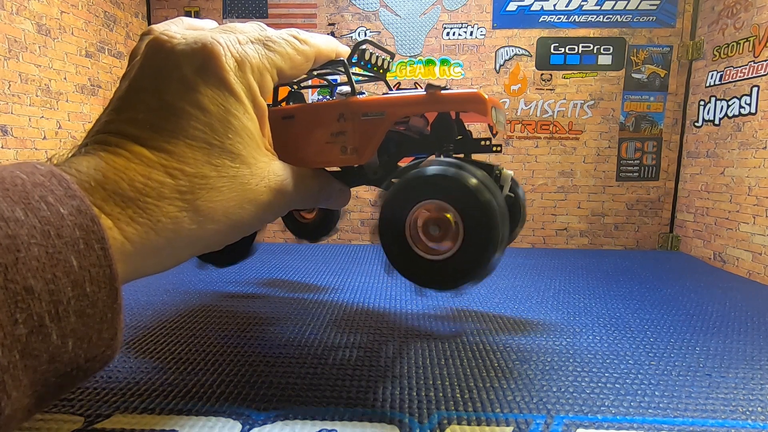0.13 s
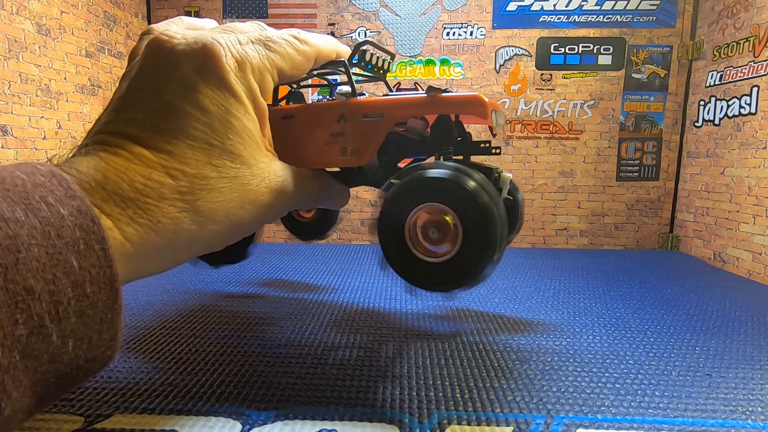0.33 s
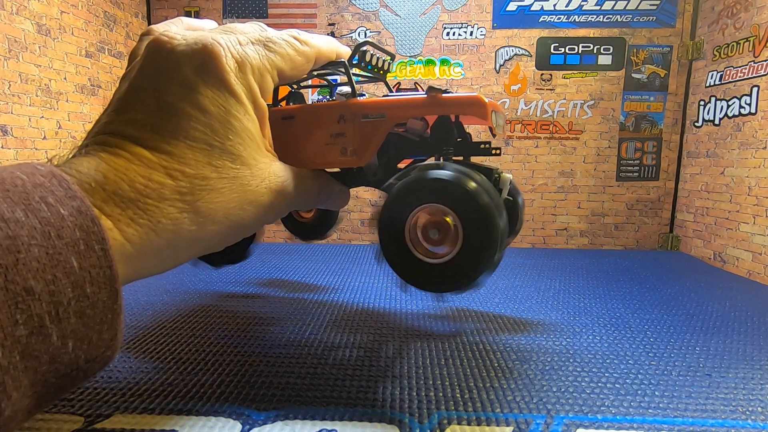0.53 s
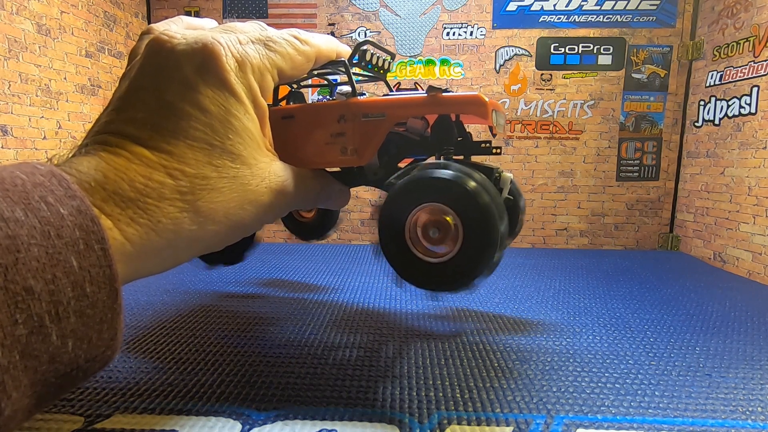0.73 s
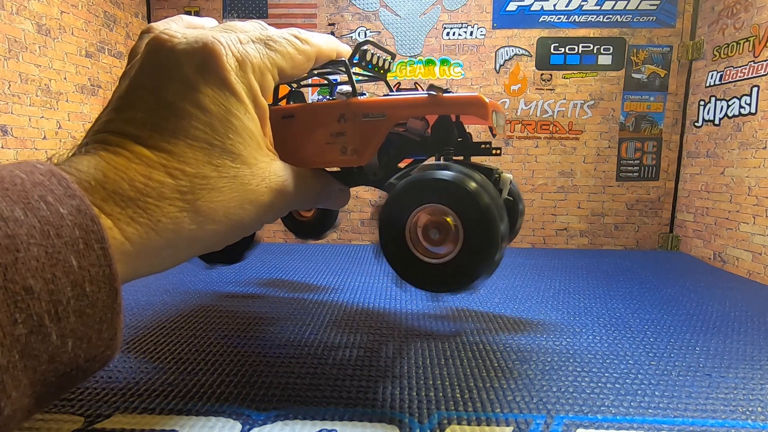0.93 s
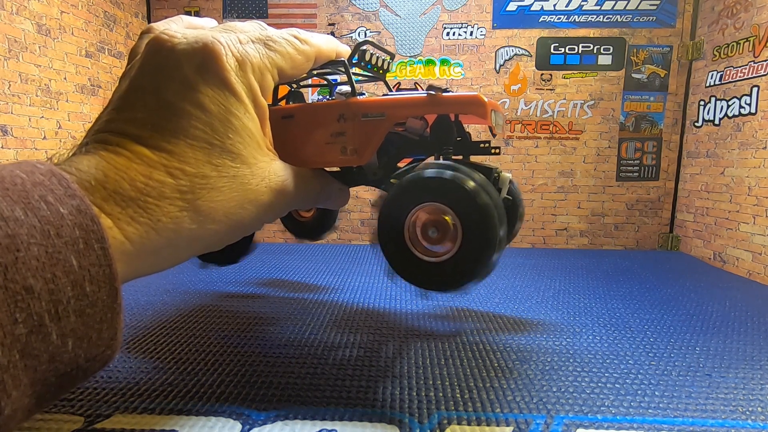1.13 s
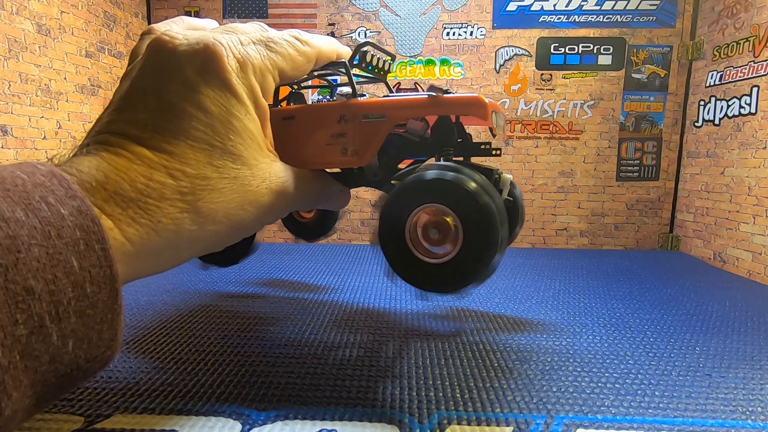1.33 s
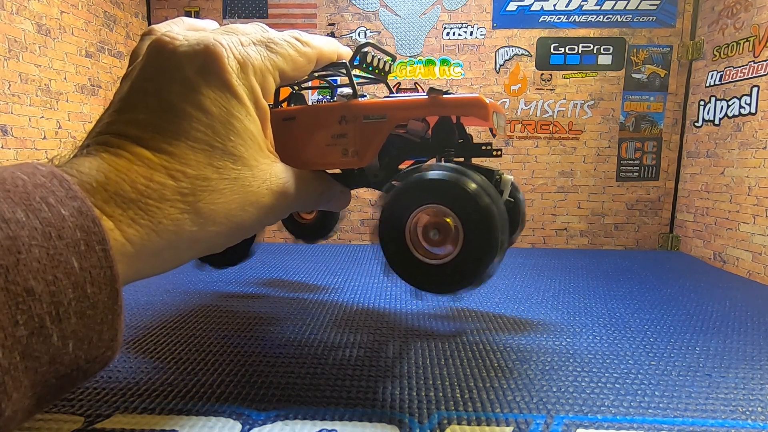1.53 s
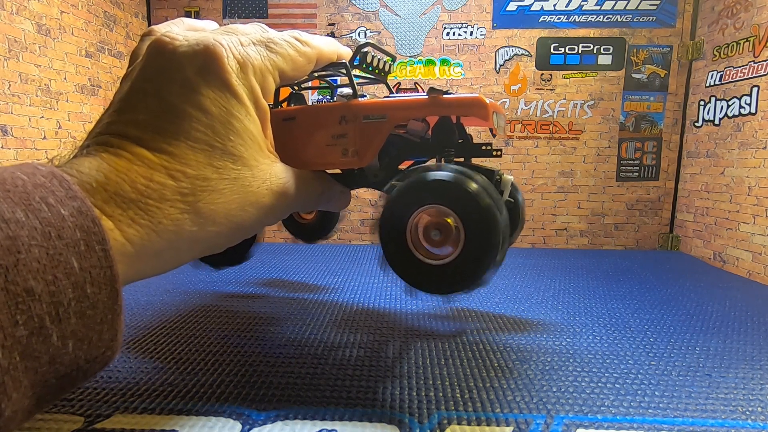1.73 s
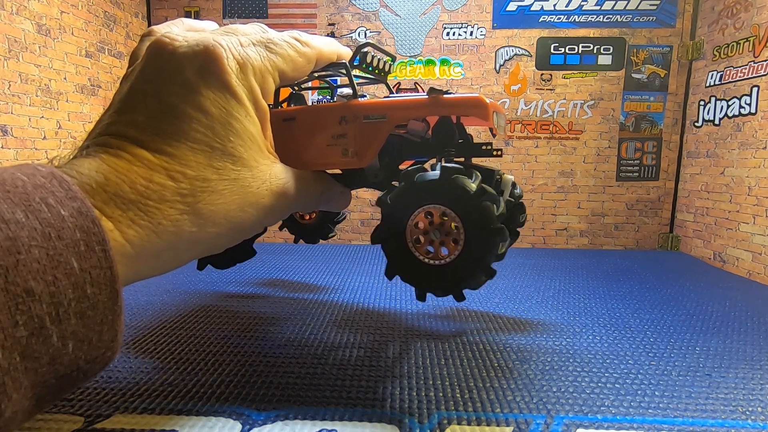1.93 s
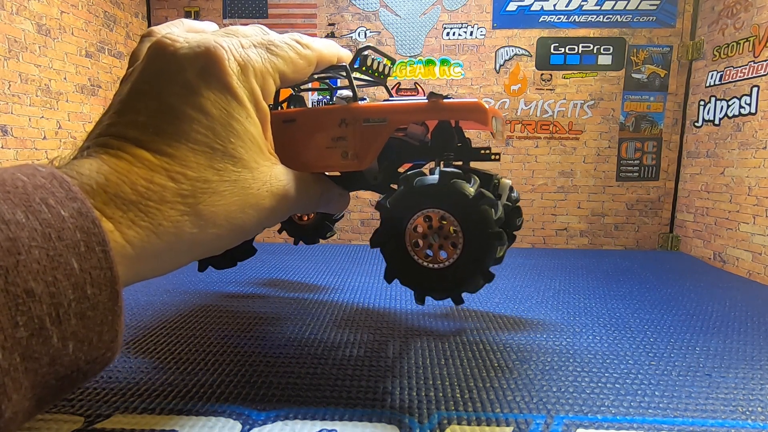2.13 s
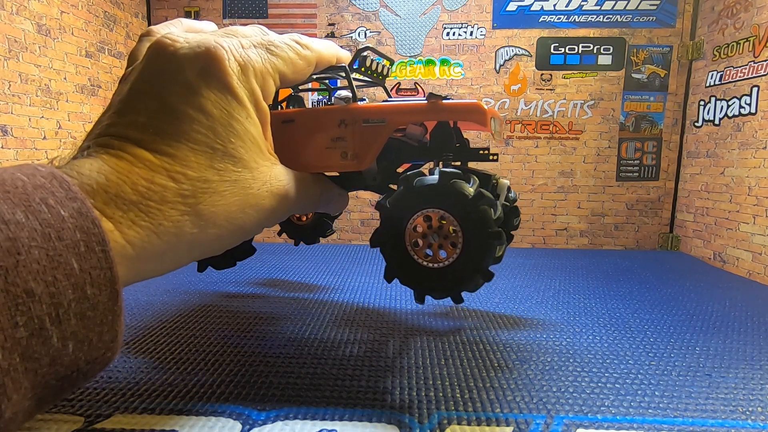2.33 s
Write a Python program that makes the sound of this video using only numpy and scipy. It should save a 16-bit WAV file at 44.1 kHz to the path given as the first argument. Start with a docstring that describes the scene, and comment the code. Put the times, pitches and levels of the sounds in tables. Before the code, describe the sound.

A toy crawler's small motor and gears whine harshly at full throttle, then abruptly clatter to a stop

```python
"""Toy crawler revving in the air

A toy crawler is held up in a small room, its wheels spinning at full throttle. The motor whine and gear whirr
are fluttering sines locked to rotor and shaft; the speed swings with each wheel turn. Rattle, scuffs and knocks
are coloured noise under gear forces, with the rattle sent through ringing resonances. The throttle closes, the
whine falls and the slack gears clatter for a fifth of a second with a few last knocks. A short room tail
follows the gears; the room's hum and noise remain, and a low rumble comes and goes."""
import sys
import numpy as np
from scipy import signal
from scipy.fft import rfft, irfft
from scipy.io import wavfile

SR = 44100
rng = np.random.default_rng(int(sys.argv[2]) if len(sys.argv) > 2 else 0)


def int16_out(signal):
    """Quantize to a 16-bit WAV file."""
    q = np.round(np.clip(np.atleast_2d(signal).T, -1, 1) * 32767)
    wavfile.write(sys.argv[1], SR, q.astype(np.int16))


N = 104472
T = np.arange(N) / SR
ROTOR_HZ, SHAFT_HZ, WHEEL_HZ = 959.5, 100.5, 9.2  # turns per second at full speed; steady wheel rate
FLUTTER_PER_S = 85  # flutter rate of whine and whirr

# stereo likeness of rattle and knocks, clipped to +-0.99 in use: (frequency [Hz], likeness)
GEAR_LIKENESS = [(100, 0), (700, 6.8), (1400, -0.5), (2200, 2.7), (4500, 1), (5700, 0.8), (6800, 12),
                 (7400, -0.2), (7900, 0.23), (9400, -0.02), (10700, -0.14), (11500, 0.6), (14000, 0)]


def from_db(db):
    """Decibels to gain."""
    return 10 ** (np.asarray(db) / 20)


def rms_one(x):
    """Scale to unit power."""
    return x / np.sqrt(np.mean(x ** 2) + 1e-20)


def in_time(rows):
    """A control curve at every sample."""
    return np.interp(T, *np.transpose(rows))


def per_bin(points):
    """A frequency table read on a log axis at every bin of the padded spectrum."""
    hz, value = np.transpose(points)
    bin_hz = np.arange(N + 1) * SR / (2 * N)
    return np.interp(np.log(bin_hz + 1), np.log(hz), value)


def drift(rate):
    """Smooth chance with unit power: white noise through a double one-pole low-pass at rate [Hz]."""
    r = np.exp(-2 * np.pi * rate / SR)
    smooth = signal.lfilter([1], [1, -2 * r, r * r], rng.standard_normal(N + SR))
    return rms_one(smooth[SR:])  # the first second lets the filter settle


def pan(db):
    """Left and right gains for a level difference."""
    return from_db(np.array([[.5], [-.5]]) * db)


def stereo_noise(envelope, spectrum, likeness):
    """Noise under an envelope, coloured and spread between the ears."""
    mid, side = rfft(rng.standard_normal((2, N)) * envelope, 2 * N)
    c = np.clip(likeness, -.99, .99)
    both = np.sqrt(1 + c) * mid + np.sqrt(1 - c) * side * [[1], [-1]]
    colour = rms_one(from_db(per_bin(spectrum)))
    return irfft(both * colour)[:, :N]


def partials(orders, table, turns, flutter_db):
    """Fluttering tones at multiples of a rotation, each reaching the ears with its own level and phase."""
    out = 0
    for order, (db, lean_db, lead) in zip(orders, table):
        phase = 2 * np.pi * (order * turns + rng.random()) + np.array([[lead], [0]])
        flutter = from_db(flutter_db * np.clip(drift(FLUTTER_PER_S), -2, 2))
        tone = np.sin(phase) * flutter
        out = out + from_db(db) * pan(lean_db) * rms_one(tone)
    return out


def motor_whine(rotor):
    """The motor sounds multiples of the rotor rate, each fluttering on its own."""
    # multiples of the rotor rate, one for each partial
    whine_orders = [1, 2, 3, 4, 5, 6, 7, 9, 10, 11]
    # partials before load and speed: (level [dB], left-right difference [dB], left phase lead [rad])
    whine_partials = [(-61, -7.5, 1), (-60, -2, 3), (-44, -5.5, 1), (-45.5, 3, -5), (-46, -4.5, -13),
                      (-37, -9, 6.2), (-30.5, 0.5, 1.1), (-36, 4, 3.5), (-64.5, -0.5, 8), (-67, -1.5, 11.5)]
    return partials(whine_orders, whine_partials, rotor, flutter_db=11)


def gear_whirr(shaft):
    """The gears whirr at multiples of the shaft rate."""
    # multiples of the shaft rate, one for each partial
    whirr_orders = [1, 2, 3, 8, 12, 54.5, 64, 69]
    # balance of the partials: (relative level [dB], left-right difference [dB], left phase lead [rad])
    whirr_partials = [(-65.5, 13, -0), (-56.5, -12, 0.5), (-54, 2.5, 0), (-49, -8, 0.5), (-51.5, 4.5, -0.3),
                      (-38.5, -12, -0.1), (-35.5, 0, 0.32), (-48.5, -2.5, .3)]
    lift_db = 1.5
    return from_db(lift_db) * partials(whirr_orders, whirr_partials, shaft, flutter_db=4.5)


def gear_chatter(shaft):
    """Fast chatter, slower surges and one swing per shaft turn shake the level."""
    chatter_db, surge_db, shaft_swing_db = 1.5, 1, 1
    wobble_db = chatter_db * drift(370) + surge_db * drift(75)
    return rms_one(from_db(wobble_db + shaft_swing_db * np.sin(2 * np.pi * shaft)))


def tooth_force(turns):
    """A tooth strikes once per turn, each time with its own force, over steady rubbing."""
    spread_db, decay_s, rub_share = 1.5, 0.00019, 1  # rubbing against strikes of unit power
    strength = from_db(spread_db * np.clip(rng.standard_normal(N), -2, 2))
    strikes = np.diff(np.floor(turns), prepend=0) * strength
    ringing = signal.lfilter([1], [1, -np.exp(-1 / (decay_s * SR))], strikes + 1e-18)
    return rub_share + rms_one(ringing)


def rattle(turns, chatter):
    """The driven gears rattle in step with the rotor."""
    # colour of the gear rattle: (frequency [Hz], relative level [dB per Hz])
    rattle_colour = [(60, -70), (300, -23), (480, -22.5), (660, -21), (820, -15), (1050, -22),
                     (1400, -19.5), (1900, -15), (2500, -17), (3400, -15.5), (4300, -12), (5300, -3.5),
                     (6000, -8.5), (6600, -1.5), (7500, -11), (8450, -14), (9250, -17), (10300, -17.5),
                     (11400, -28), (14000, -28.5), (15000, -55)]
    force = rms_one(tooth_force(turns) * chatter)
    level_db = -26.5  # before load and resonances
    return from_db(level_db) * stereo_noise(force, rattle_colour, per_bin(GEAR_LIKENESS))


def gearbox(x):
    """The rattle rings at a set of resonances, and each pitch range is thrown to its own side."""
    # resonances rung by the driven rattle: centre frequency [Hz]
    casing_hz = [2530, 2880, 3200, 3900, 5430, 5740, 6440, 6720, 8630, 8850, 9750, 10320]
    # the same resonances: (width [Hz], level over the rattle [dB])
    casing_rings = [(190, 3), (40, 9), (120, -3), (247, -7.5), (200.7, -11), (110, -12), (110.9, -8),
                    (150, -8.5), (110.3, 2.5), (142, 5.5), (296, -2), (220, 0.5)]
    # side each pitch range leans to: (frequency [Hz], left-right difference [dB])
    casing_lean = [(200, -3.5), (800, -0.5), (1450, -5), (1850, 2.5), (2400, -2), (4600, -2), (5600, -1.5),
                   (6300, -5.5), (6700, 3.5), (8000, -13.5), (9000, 1.5), (9800, 2.5), (10600, -1.5),
                   (14000, 0)]
    out = x.copy()
    for hz, (width, db) in zip(casing_hz, casing_rings):
        r = np.exp(-np.pi * width / SR)
        feed = np.array([1, 0, -1]) * (1 - r * r) / 2
        feedback = [1, -2 * r * np.cos(2 * np.pi * hz / SR), r * r]
        out += from_db(db) * signal.lfilter(feed, feedback, x)
    return irfft(rfft(out, 2 * N) * pan(per_bin(casing_lean)))[:, :N]


def scuffs(turns):
    """The gears bind and rasp in short, uneven swells."""
    # swells while the motor drives, about twelve a second: (time [s], level [dB])
    swells = [(0.036, -38), (.12, -37.5), (.195, -40.5), (0.276, -35), (.35, -33), (.435, -38), (.525, -43),
              (0.596, -34), (.67, -39), (.74, -40.5), (0.821, -36), (0.916, -35.5), (1.139, -35),
              (1.23, -34.5), (1.30, -38), (1.39, -40.5), (1.47, -37), (1.559, -35), (1.65, -45),
              (1.71, -39.5), (1.80, -40), (1.84, -38)]
    # colour of the scuffs: (frequency [Hz], relative level [dB per Hz])
    scuff_colour = [(500, -17), (1300, -11), (1850, -2.5), (2400, 2.5), (2900, -1.5), (4000, -11.5),
                    (8000, -32)]
    swell_s = 0.018  # from the peak to 1/e
    force = sum(from_db(db) * np.exp(-((T - s) / swell_s) ** 2) for s, db in swells)
    return stereo_noise(force * rms_one(tooth_force(turns)), scuff_colour, likeness=0.43)


def run_down():
    """The gears whine roughly, at a falling pitch, as the drive slows."""
    # path of the falling whine: (time [s], pitch [Hz], level [dB])
    fall = [(1.845, 5350, -46), (1.87, 5250, -29.5), (1.888, 5150, -44), (1.897, 4600, -37),
            (1.908, 3750, -32), (1.915, 3600, -52)]
    s, hz, db = np.transpose(fall)
    pitch = np.interp(T, s, hz) * (1 + .025 * drift(290))  # the jitter roughens the tone
    level = np.interp(T, s, from_db(db), left=0, right=0)
    return level * rms_one(np.sin(2 * np.pi * np.cumsum(pitch) / SR))


def chassis(speed, turns):
    """The rotor's own tone swells near the pitch of the chassis."""
    chassis_hz, width_hz, level_db = 928, 22, -43.5
    nearness = np.exp(-((ROTOR_HZ * speed - chassis_hz) / width_hz) ** 2)
    return from_db(level_db) * nearness * rms_one(np.sin(2 * np.pi * turns))


def coasting(speed):
    """Unloaded teeth clatter ever more slowly as the drive slows, then cut off."""
    # clatter once the throttle closes, silent outside these times: (time [s], level [dB])
    clatter_level = [(1.84, -46), (1.87, -42), (1.905, -29.5), (1.93, -37), (1.962, -31.5), (1.972, -40.5),
                     (2.032, -43), (2.037, -71.5)]
    # colour of the unloaded gears and casing: (frequency [Hz], relative level [dB per Hz])
    clatter_colour = [(100, -35), (560, -19), (790, -3), (1050, -15), (1300, -19.5), (1500, -3),
                      (2000, -8.5), (2400, -23), (2620, -2.5), (3200, -2.5), (3550, -3.5), (3900, 3),
                      (4350, 0), (5450, 1), (5950, -2), (6500, -1), (7400, -5), (7950, -1.5), (9200, -11),
                      (9850, -3.5), (11000, -21), (14000, -20), (15000, -45)]
    teeth_per_s = 1900  # at full speed
    s, db = np.transpose(clatter_level)
    level = from_db(np.interp(T, s, db)) * (T > s[0]) * (T < s[-1])
    force = rms_one(tooth_force(np.cumsum(teeth_per_s * speed) / SR))
    return stereo_noise(level * force, clatter_colour, likeness=.75)


def knocks():
    """The slack in the gears is taken up in short clacks."""
    # backlash knocks as the drive stops: (time [s], level [dB])
    clacks = [(1.878, -25), (1.989, -30), (1.995, -33), (2.005, -40), (2.025, -41), (2.144, -58)]
    # colour of the knocks: (frequency [Hz], relative level [dB per Hz])
    knock_colour = [(100, -44), (800, -10), (2000, -10.5), (3900, 4.5), (6500, -1.5), (10000, -7),
                    (15000, -33.5)]
    decay_s = .004  # to 1/e
    force = sum(from_db(db) * (T >= s) * np.exp(-np.abs(T - s) / decay_s) for s, db in clacks)
    return stereo_noise(force, knock_colour, per_bin(GEAR_LIKENESS))


def room(x):
    """A short diffuse tail, different at each ear; its treble dies first."""
    t60_s, treble_t60_s, split_hz, gap_s, level_db = 0.6, 0.27, 2460, 0.0005, -8
    t = T[:SR // 2]
    white = rng.standard_normal((2, len(t)))
    low = signal.sosfiltfilt(signal.butter(2, split_hz, fs=SR, output="sos"), white)
    treble = white - low
    tail = low * from_db(-60 * t / t60_s) + treble * from_db(-60 * t / treble_t60_s)
    tail = rms_one(tail * (t > gap_s)) / np.sqrt(len(t))
    return from_db(level_db) * signal.fftconvolve(x, tail, axes=1)[:, :N]


def ambience():
    """Room noise with a faint, wavering hum; beside it, a low rumble comes and goes."""
    # hum tones: (frequency [Hz], level [dB])
    hum_tones = [(58.5, -80.5), (112, -66.5), (247, -60.5)]
    # colour of the room noise: (frequency [Hz], relative level [dB per Hz])
    air_colour = [(25, -36), (55, 3), (80, -12), (150, 0.5), (200, -7.5), (255, -3.5), (310, -13),
                  (390, -11), (560, -15), (1400, -14), (3000, -25.5), (6000, -46), (12000, -61)]
    # stereo likeness of noise and rumble, clipped to +-0.99 in use: (frequency [Hz], likeness)
    air_likeness = [(60, 0.95), (250, 1), (700, 0.28), (2000, 0.24), (8000, .3)]
    # level of the low rumble: (time [s], level [dB])
    rumble_level = [(0, -55), (.14, -62), (.39, -51.5), (.66, -53), (.73, -68), (1.35, -59.5),
                    (1.65, -55.5), (1.76, -64), (1.84, -51.5), (1.95, -65), (2.05, -54), (2.22, -61.5),
                    (2.33, -51)]
    # colour of the rumble: (frequency [Hz], relative level [dB per Hz])
    rumble_colour = [(30, -37), (70, 20), (105, 19.5), (160, 16.5), (260, -29), (450, -44), (2000, -83)]
    air_db, lean_db = -54.5, -0.5
    hum = sum(from_db(db) * rms_one(np.sin(2 * np.pi * hz * T + .5 * drift(1.7))) for hz, db in hum_tones)
    likeness = per_bin(air_likeness)
    air = stereo_noise(from_db(air_db), air_colour, likeness)
    rumble = stereo_noise(from_db(in_time(rumble_level)), rumble_colour, likeness)
    return pan(lean_db) * (hum + air + rumble)


def drive_speed():
    """Share of full speed, swinging once per wheel turn and wandering slightly."""
    # throttle held, then closed: (time [s], share of full speed)
    speed_curve = [(0, 1), (1.83, 1), (1.88, .92), (1.91, .64), (1.97, .4), (2.04, .05)]
    wheel_swing = .004 * np.cos(2 * np.pi * WHEEL_HZ * T)
    return in_time(speed_curve) * (1 + wheel_swing + .0015 * drift(8))


def scene():
    """One speed and one load drive motor, shaft and gears."""
    # force on the driven gears: (time [s], level [dB])
    load_curve = [(0, -2), (.4, -1.5), (1.5, -1.5), (1.76, -2), (1.86, -1.5), (1.885, -13.5), (1.93, -13),
                  (1.97, -58)]
    speed = drive_speed()
    # turns made so far, each rotation with its own small jitter
    rotor = np.cumsum(ROTOR_HZ * speed * (1 + .003 * drift(150))) / SR
    shaft = np.cumsum(SHAFT_HZ * speed * (1 + .004 * drift(110))) / SR
    chatter = gear_chatter(shaft)
    load = from_db(in_time(load_curve))

    tones = motor_whine(rotor) + gear_whirr(shaft)
    whine = chatter * (load * speed * tones + run_down())
    driven = gearbox(load * rattle(rotor, chatter)) + scuffs(rotor)
    slack = pan(-2) * (coasting(speed) + knocks())
    gears = driven + slack
    return whine + chassis(speed, rotor) + gears + room(gears) + ambience()


def record(dry):
    """The highest peaks are rounded and the top is cut steeply."""
    peak_limit, cutoff_hz = 0.41, 14800
    rounded = peak_limit * np.tanh(dry / peak_limit)
    return signal.sosfilt(signal.ellip(10, .2, 80, cutoff_hz, fs=SR, output="sos"), rounded)


dry = scene()
out = record(dry)
int16_out(out)
```